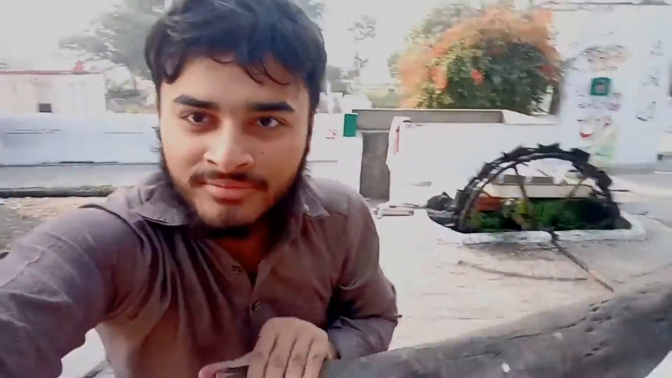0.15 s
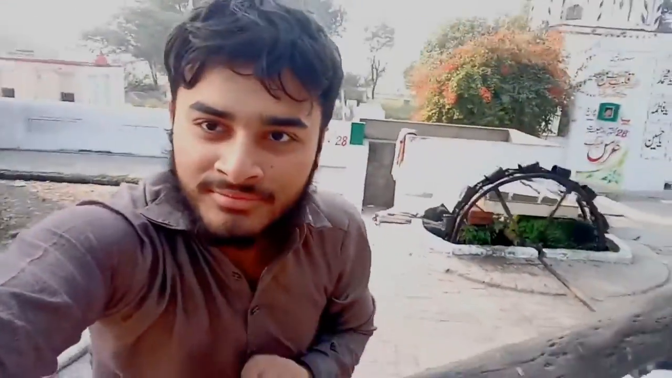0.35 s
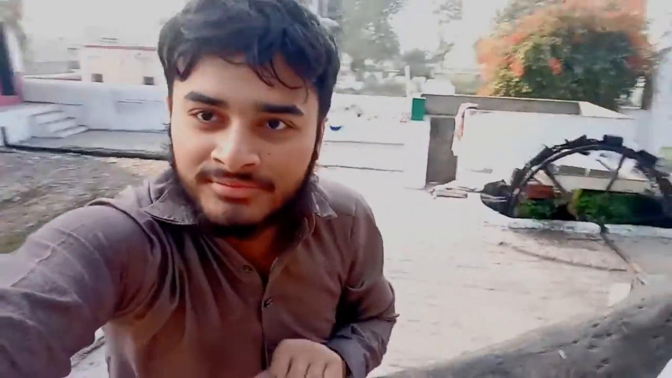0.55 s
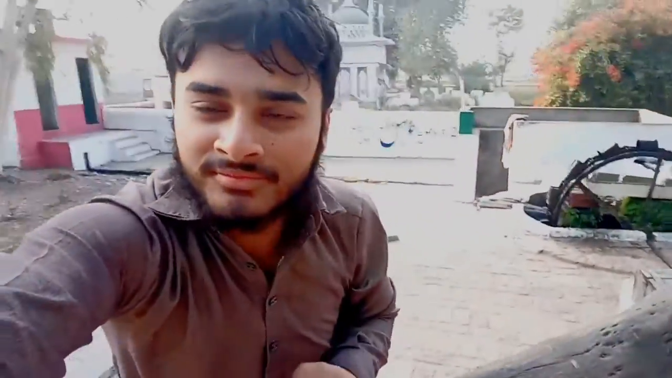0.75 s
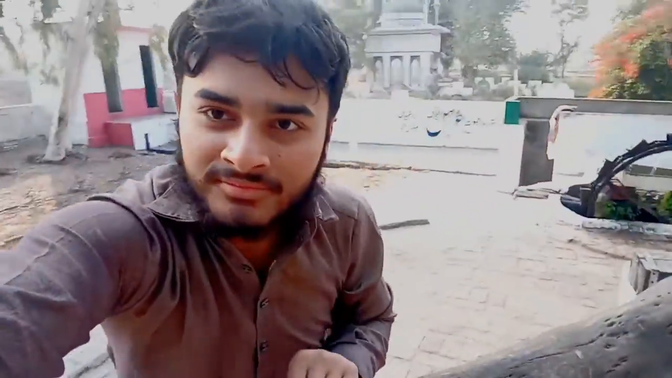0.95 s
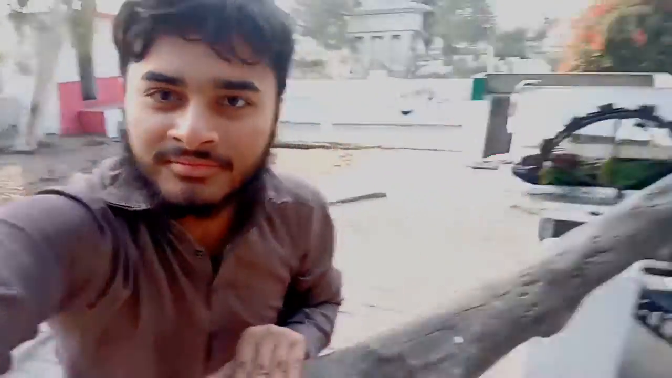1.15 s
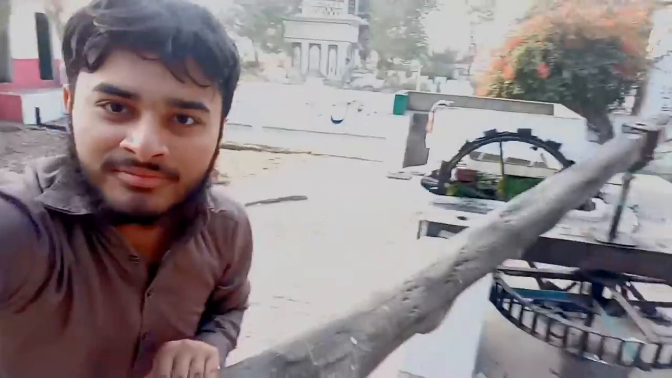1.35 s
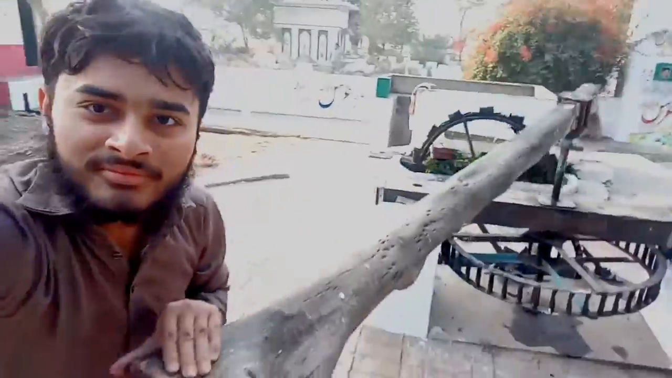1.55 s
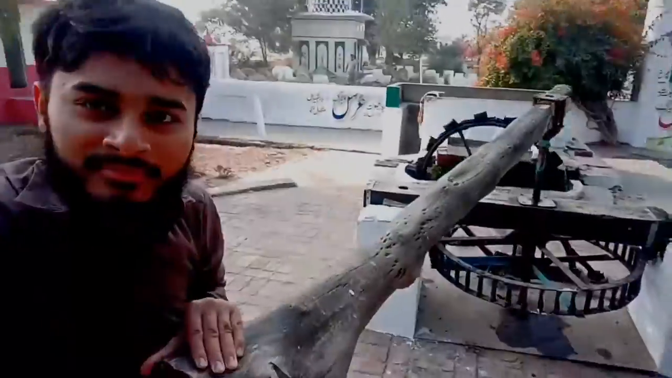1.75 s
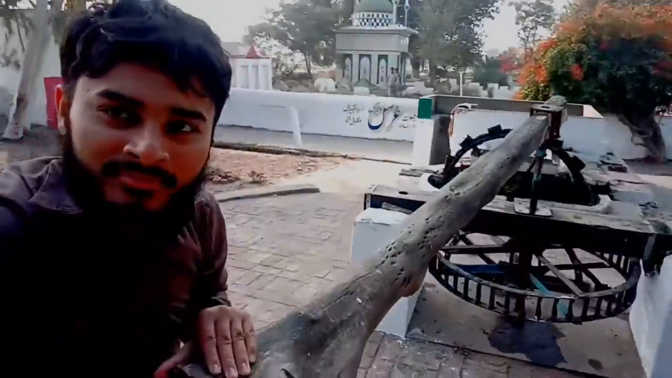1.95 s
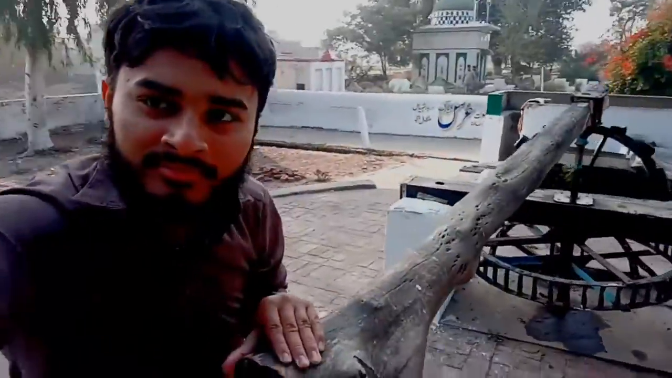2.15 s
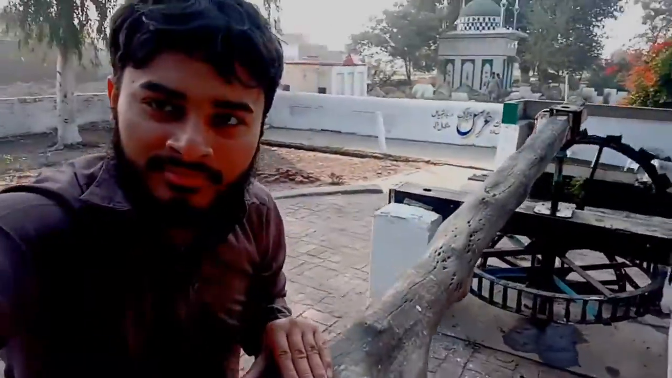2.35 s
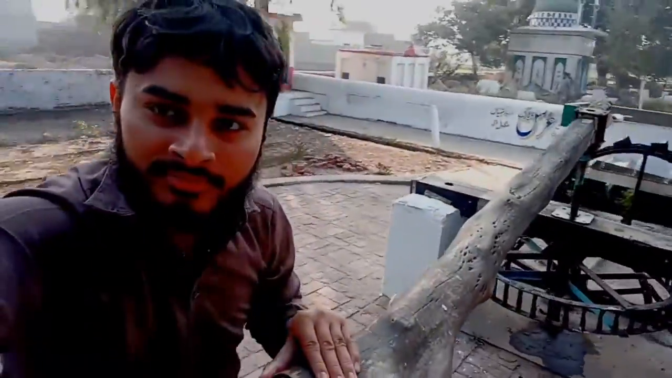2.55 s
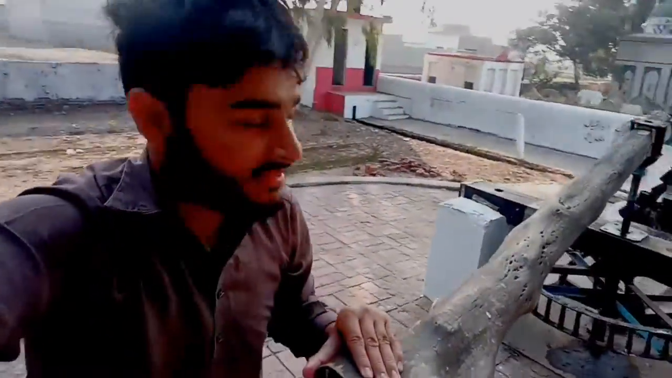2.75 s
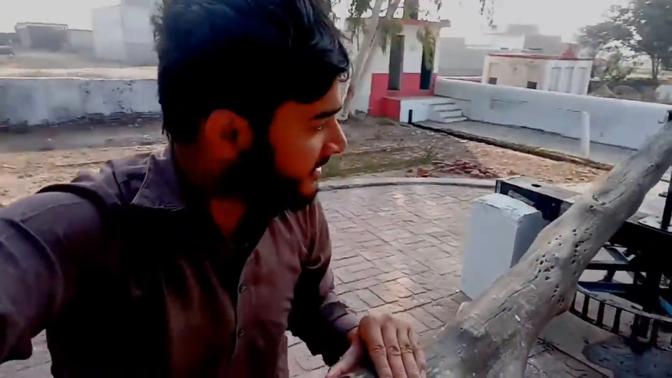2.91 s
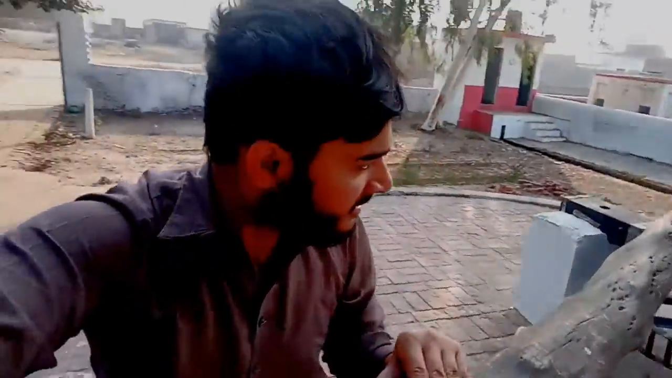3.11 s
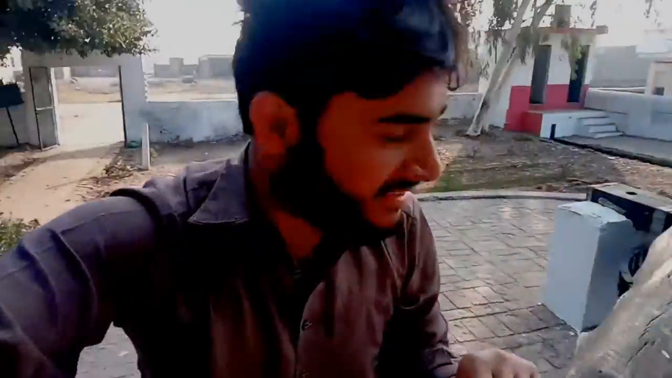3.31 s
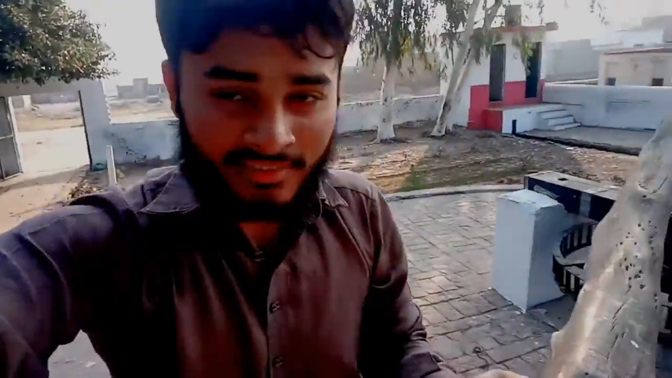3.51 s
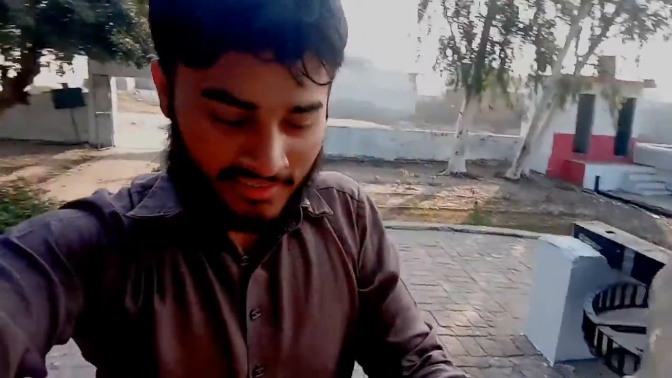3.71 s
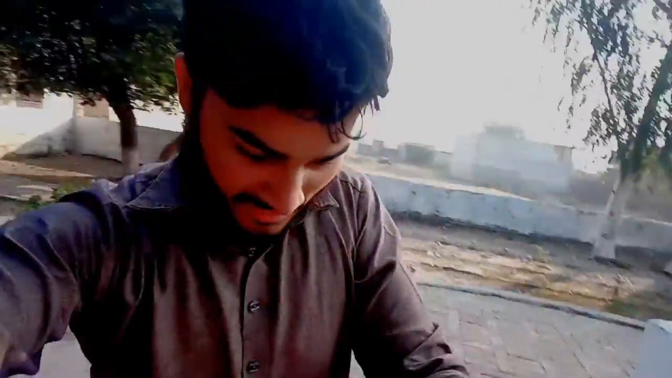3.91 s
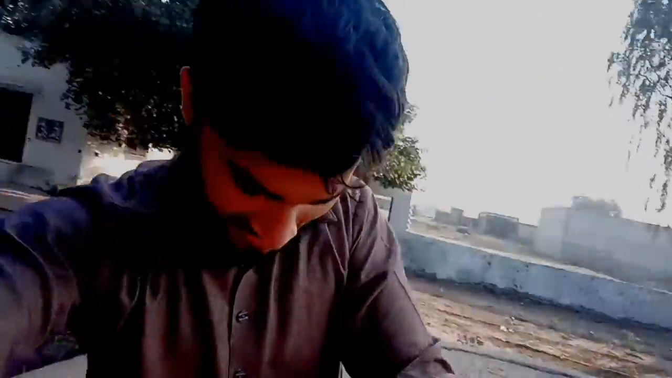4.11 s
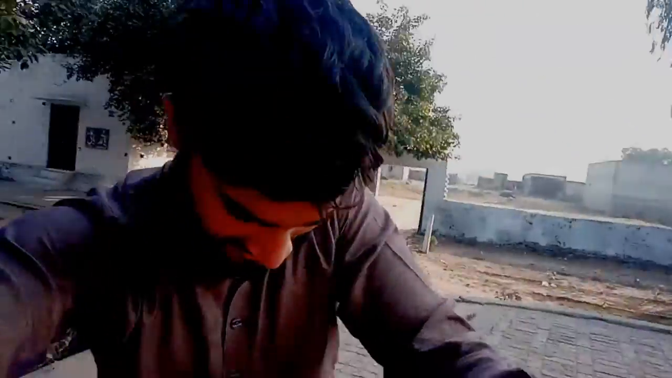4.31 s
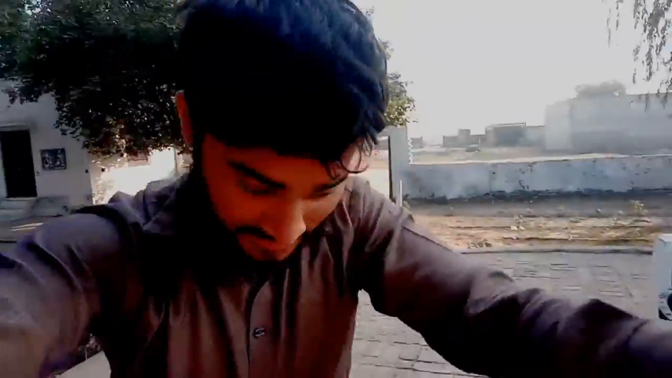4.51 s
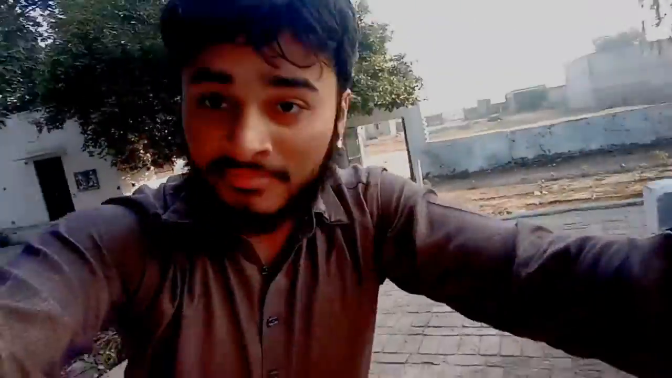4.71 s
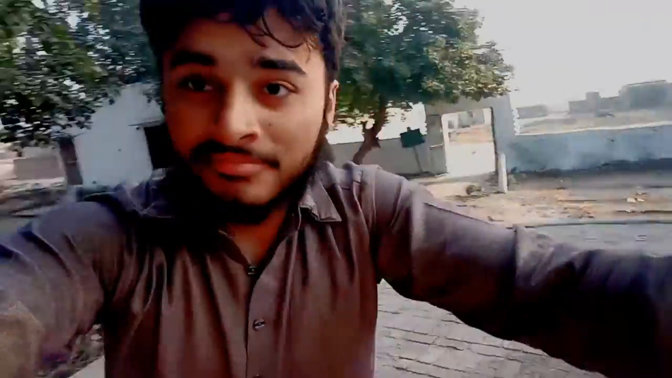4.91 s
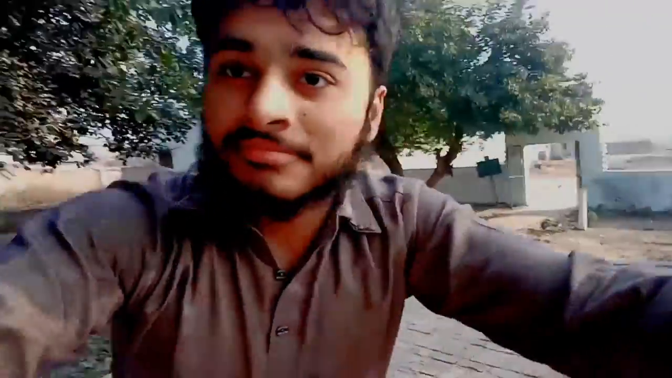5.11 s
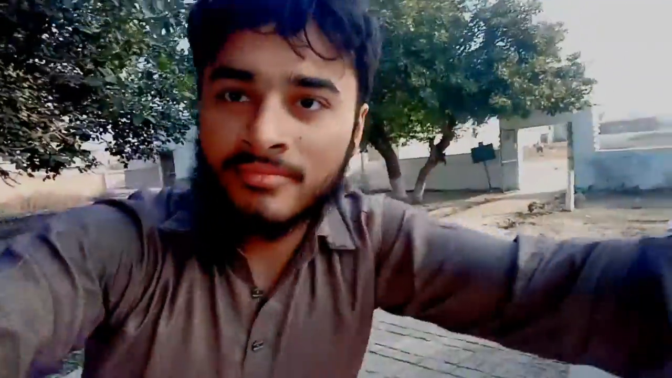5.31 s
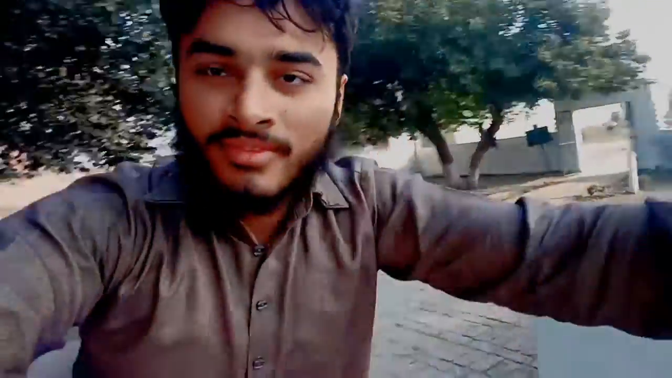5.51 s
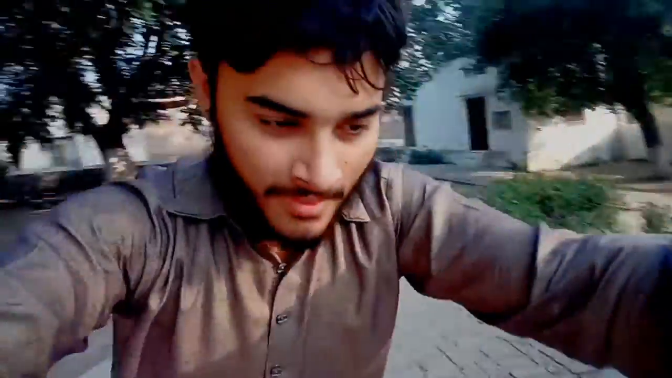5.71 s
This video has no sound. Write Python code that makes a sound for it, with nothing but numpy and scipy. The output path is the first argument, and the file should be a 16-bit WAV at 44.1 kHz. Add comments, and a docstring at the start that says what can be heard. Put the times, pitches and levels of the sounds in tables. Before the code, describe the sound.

A hand-turned well wheel ratchets unevenly: hard metallic clacks in little clusters, ringing briefly and damped as the pawl lands. Early hollow knocks and faint creaks give way to steady bright clatter, a sharp double tick midway, duller clacks later, then strong knocking hits near the end. Grinding gears continue throughout; the outdoor echo is slight, and low air stirs at the nearby phone microphone.

```python
"""Uneven steel clacks with short ringing tails, over a grinding scrape and rumble, knocks, ticks and low puffs of air.
A hand-turned well wheel in an open yard: a steel pawl is dragged up each ratchet tooth, drops and bounces.
Every contact is a noise burst plus damped modes of the iron wheel and of the pawl, which landing damps.
Gears are patchy noise, knocks are damped sines and band noise, air is low noise, the yard a decaying noise echo."""
import sys
import numpy as np
from scipy import signal
from scipy.fft import rfft, irfft, next_fast_len
from scipy.io import wavfile
from scipy.ndimage import uniform_filter1d, minimum_filter1d, map_coordinates

SR = 44100
rng = np.random.default_rng(int(sys.argv[2]) if len(sys.argv) > 2 else 0)


def to_wav(s):
    """Save 16-bit WAV."""
    ch = np.atleast_2d(s).T  # columns
    pcm = np.round(np.clip(ch, -1, 1) * 32767)  # PCM
    wavfile.write(sys.argv[1], SR, pcm.astype(np.int16))


N = 258426

# pawl contacts: (time [s], clack level [dB], boost under 2 kHz [dB], ring level [dB],
# place struck along the pawl [0-1], hardness [dB per octave], jingle level [dB], free flight [s])
CONTACTS = [(0.156, -30, -9.0, -23.5, 0.08, -12, -56, 0.029),
            (0.181, -26, 10.5, -15.9, 0.58, -1.9, -40.5, 0.064),
            (0.231, -25, 3.5, -24, 0.55, 7, -50.2, 0.016), (0.402, -20.5, 4, -15.5, 0.1, 5, -39.5, 0.021),
            (0.447, -18.5, -1.5, -26, 0.5, -3, -52, 0.072), (0.595, -17.5, 4.5, -20, 0.69, -5, -54, 0.025),
            (0.619, -11, -5, -20.5, 0.44, 4, -35.5, 0.045), (0.66, -14.5, -0.5, -22.4, 0.72, 1, -55, 0.039),
            (0.843, -8, -11.5, -6, 0.99, -4.5, -34, 0.028),
            (0.898, -19.5, -8.5, -17.5, 0.08, 3, -53.5, 0.0094),
            (1.088, -9.5, -7, -9, 0.14, 8, -34.5, 0.051), (1.14, -16, -4, -16, 0.89, -9.5, -54, 0.03),
            (1.323, -13, -1, -5.5, 0.15, -1.5, -32.5, 0.076),
            (1.357, -19, -8, -10, 0.27, -4.5, -45.5, 0.057),
            (1.394, -14.5, -4, -11.5, 0.95, -9, -47, 0.031), (1.559, -11, -5.5, -3.5, 0.13, -1.8, -35, 0.1),
            (1.595, -21, 1, -6.6, 0.63, -3, -47, 0.015), (1.615, -22, -5, -16.5, 0.2, -3, -63, 0.029),
            (1.642, -30, 10.5, -30, 0.21, -5, -61.5, 0.075),
            (1.797, -11.2, -7.5, -9.5, 0.18, 1.5, -32.5, 0.0065),
            (1.813, -22, 5.5, -18.1, 0.94, 3, -54, 0.014), (1.859, -22, 4, -15, 0.88, 2.5, -57, 0.012),
            (2.01, -8.5, -8.5, -13, 0.37, -13, -36.5, 0.0047), (2.039, -10, -3, -11, 0.46, 1.5, -38, 0.07),
            (2.089, -17, -7, -18, 0.71, -4.5, -54.5, 0.013), (2.273, -8.5, -6, -9, 0.1, 7, -30.5, 0.033),
            (2.306, -16.5, 0.5, -11, 0.6, 1, -45.5, 0.019), (2.325, -19, 0.5, -13, 0.43, -2, -53.5, 0.026),
            (2.505, -12, -5, -11, 0.46, -6.5, -37.5, 0.02), (2.525, -28, -3, -14, 0.39, -5.9, -48.5, 0.016),
            (2.57, -14, -7.0, -9, 0.4, 0, -42.5, 0.013), (2.759, -8.5, -14.5, -16.5, 0.66, 0.1, -31, 0.033),
            (2.783, -20.2, -10, -19.5, 0.58, -5, -48.5, 0.032),
            (2.831, -25.5, -12, -16, 0.35, -3, -58, 0.0027),
            (3.069, -12.5, -3.5, -15, 0.03, 2.1, -26.5, 0.026),
            (3.101, -25.5, 1, -16, 0.08, -8, -52, 0.0063), (3.142, -22.5, 2, -21.3, 0.08, -4, -63, 0.013),
            (3.353, -10.5, -3, -11.5, 0.26, -1, -40, 0.035),
            (3.415, -21.2, 5.5, -17, 0.04, 7, -49.5, 0.023),
            (3.594, -10.5, -10.5, -11.5, 0.62, 6, -33, 0.11),
            (3.634, -18.5, -0.5, -20.5, 0.47, 8, -42, 0.03),
            (3.829, -16.5, 1.5, -11, 0.42, -8.5, -45.5, 0.027),
            (3.846, -23, 10.5, -14.5, 0.71, -3.9, -42, 0.022),
            (3.883, -18.5, 3.5, -19.5, 0.46, -1.5, -55.5, 0.025),
            (4.078, -18.2, 6.5, -10, 0.28, -8, -42, 0.032), (4.098, -23, 7.5, -12, 0.3, -2, -51, 0.013),
            (4.135, -20.5, 2.5, -23.5, 0.72, 3, -56.2, 0.045),
            (4.307, -15, -9, -18, 0.48, -1.5, -50, 0.049),
            (4.355, -24.2, -10, -22.5, 0.43, 8.1, -56.2, 0.0053),
            (4.535, -16.5, -0.5, -23, 0.16, 6, -35.5, 0.043), (4.572, -26, 7, -21, 0.4, 5, -60, 0.0082),
            (4.732, -19, -4, -15.5, 1, -5.5, -45, 0.045), (4.789, -19.5, -7.5, -33, 0.16, 5, -64, 0.062),
            (4.916, -16, 1, -12, 0.48, 9, -47.2, 0.046), (5.088, -12, -18.5, -15.5, 0.34, 2, -42, 0.03),
            (5.117, -21, 3, -20.5, 0.93, 3, -60, 0.017), (5.133, -23, 0, -21, 0.76, -4, -59, 0.064),
            (5.251, -12.5, -0.5, -11, 0.72, 8, -57, 0.029), (5.337, -30.5, 13.5, -22, 0.0, -7, -67, 0.015),
            (5.378, -24, -3.5, -38, 0.44, -5, -66, 0.059), (5.421, -11.5, -3, -13.8, 0.36, 2, -35.5, 0.011),
            (5.57, -9.5, -1.5, -8, 0.05, 2, -40, 0.026), (5.61, -23, 6.5, -18, 0.83, 1, -61, 0.021),
            (5.721, -9, -4, -10, 0.08, 4, -45, 0.023), (5.766, -19.5, -3, -19.2, 0.44, 1.5, -64, 0.03)]


def amp(db):
    """Gain of a level in dB."""
    return 10 ** (np.asarray(db) / 20)


def unit(x):
    """Scaled to rms 1."""
    return x / np.sqrt(np.mean(x ** 2) + 1e-20)


def along(points, hz):
    """Interpolates (frequency [Hz], value) points on a log frequency axis."""
    point_hz, value = np.transpose(points)
    return np.interp(np.log(hz + 1), np.log(point_hz + 1), value)


def wobble(knots_per_s):
    """A smooth random curve as long as the scene."""
    knots = rng.standard_normal(int(N * knots_per_s / SR) + 4)
    return map_coordinates(knots, [np.arange(N) * knots_per_s / SR])


def filtered(x, response):
    """x times a zero-phase response of frequency."""
    m = next_fast_len(len(x) + 2048)
    hz = np.fft.rfftfreq(m, 1 / SR)
    return irfft(rfft(x, m) * response(hz), m)[:len(x)]


def noise(spectrum, size=N):
    """Coloured noise of rms 1."""
    white = rng.standard_normal(size)
    return unit(filtered(white, lambda hz: amp(along(spectrum, hz))))


def around(hz, width_hz, size):
    """Noise of rms 1 in a band about hz."""
    band = [(hz / (1 + 8 * width_hz / hz), -120), (hz - width_hz / 2, -6), (hz, 0),
            (hz + width_hz, -10), (hz + 12 * width_hz, -120)]
    return noise(band, size=size)


def patchy(x, depth_db):
    """x at rms 1 with random swells, each a few hundred Hz wide and about a tenth of a second long."""
    z = signal.stft(x, nperseg=512)[2]
    field = uniform_filter1d(rng.standard_normal(z.shape), size=5, axis=0)
    field = uniform_filter1d(field, size=14, axis=1)
    swelling = signal.istft(z * amp(depth_db * unit(field)), nperseg=512)[1]
    return unit(swelling[:len(x)])


def onset(t, rise_s):
    """Exponential rise from 0 towards 1."""
    return 1 - np.exp(-t / rise_s)


def add(out, s, x):
    """Mixes x into out from time s."""
    part = out[round(s * SR):][:len(x)]
    part += x[:len(part)]


def ringing(modes, t, scatter_db, flicker_db, detune=0):
    """Damped sines of random strength, phase and detuning, each dipping on its own, 70 knots a second."""
    hz, db, t60_s = np.transpose(modes)[:, :, None]
    strength, shift = rng.standard_normal(hz.shape), rng.standard_normal(hz.shape)
    phase_turns = rng.random(hz.shape)
    knots = rng.standard_normal((len(hz), 25))
    waver = np.array([np.interp(t * 70, np.arange(25), row) for row in knots])
    level = amp(db + scatter_db * strength - flicker_db * np.abs(waver) - 60 * t / t60_s)
    sines = np.sin(2 * np.pi * (hz * (1 + detune * shift) * t + phase_turns))
    return np.sum(level * sines, axis=0)


def pawl():
    """The place struck sets each bending mode, hardness tilts them; landing and the next contact damp them."""
    # bending modes: (frequency [Hz], relative level at an antinode [dB], t60 [s],
    # half-waves along the struck length, shift [half-waves])
    bending_modes = [(2065, -13, 0.48, 1.82, 0.87), (3669, 0, .57, 2.108, .32),
                     (5335, -16, 0.84, 2.74, 0.42), (5783, -19, 0.52, 2.795, 0.67),
                     (6752, -27, 0.58, 3.93, -0.023)]
    # shortest waves: (frequency [Hz], relative level [dB], t60 [s])
    jingle_modes = [(13226, 0, .14), (8301, -11, .2), (12115, -10, .18), (14174, -8, .14), (8834, -14, .16),
                    (9814, -15, .16), (7924, -18, .12), (10406, -17, .14), (11230, -19, .12),
                    (6330, -12, .1)]
    # hiss of a steel contact: (frequency [Hz], relative density [dB per Hz])
    splash_spectrum = [(6000, -120), (7500, -12.5), (10500, -17.5), (13300, 11), (15500, -16)]
    node_db = -27  # what is left of a mode struck on its node
    pivot_hz = 3672  # hardness tilts the ring about this frequency
    out, t = np.zeros(N), np.arange(SR // 3) / SR
    next_s = [row[0] for row in CONTACTS[1:]] + [N / SR]
    hz, mode_db, t60_s, waves, shift = np.transpose(bending_modes)
    for (s, _, _, ring_db, place, hard_db, jingle_db, flight_s), cut_s in zip(CONTACTS, next_s):
        landed_s = np.maximum(t - flight_s, 0)
        rattle_db = 3 + 7 * np.clip(landed_s / 0.0091, 0, 1)  # resting on a tooth, it rattles

        shape_db = 10 * np.log10(np.cos(np.pi * (waves * place + shift)) ** 2 + amp(node_db) ** 2)
        tilt_db = hard_db * np.log2(hz / pivot_hz)
        struck = np.transpose([hz, ring_db + mode_db + shape_db + tilt_db, t60_s])
        bending = ringing(struck, t, scatter_db=0, flicker_db=rattle_db)
        damped = amp(-12.5) + amp(-60 * landed_s / 0.083)
        stopped = amp(-19) + amp(-60 * np.maximum(t - (cut_s - s), 0) / 0.0071)

        jingle = ringing(jingle_modes, t, scatter_db=4.0, flicker_db=rattle_db + 3, detune=.0006)
        splash = amp(jingle_db - 3.5 - 60 * t / 0.052) * noise(splash_spectrum, size=len(t))
        # landing does not damp the shortest waves, it only makes them flicker more
        ring = bending * damped * stopped + amp(jingle_db) * jingle + splash
        fade_out = np.clip((t[-1] - t) / .05, 0, 1)
        add(out, s, ring * onset(t, 0.00089) * fade_out)
    return out


def wheel():
    """Each contact is a lumpy noise burst that rings the iron wheel, its modes slightly shifted each time."""
    # short modes: (frequency [Hz], relative level [dB], t60 [s])
    wheel_modes = [(2415, -4, .1), (2670, -4, .16), (2892, -2, .2), (3463, -5, .12), (1330, -14, .06),
                   (1500, -14, .06), (1690, -12, .06), (1900, -8, .06), (3060, -8, .06), (3260, -6, .06),
                   (3990, -10, .05), (4620, -16, .05)]
    # clack: (frequency [Hz], relative density [dB per Hz])
    clack_spectrum = [(100, -120), (200, -18.5), (990, -13), (2380, 0.5), (3610, 0), (4330, -9),
                      (5900, -22), (7350, -36.5), (10500, -53.5), (13400, -46.5), (14600, -48.5),
                      (15600, -61.5)]
    out, t = np.zeros(N), np.arange(SR // 6) / SR
    for s, clack_db, low_db, *_ in CONTACTS:
        curve = map_coordinates(rng.standard_normal(200), [t * 450])  # 450 knots a second
        lumps = unit(amp(2.12 * curve))
        fading = amp(-4.5 - 60 * t / 0.0047) + amp(-3.5 - 60 * t / 0.072) + amp(-8.5 - 60 * t / 0.2)
        burst = noise(clack_spectrum, size=len(t)) * lumps * fading
        ring = amp(-2.5) * ringing(wheel_modes, t, scatter_db=4.5, flicker_db=7.5, detune=0.0041)
        blow = (burst + ring) * onset(t, 0.00086)
        boosted = filtered(blow, lambda hz: amp(low_db / (1 + (hz / 2100) ** 8)))
        add(out, s, amp(clack_db) * boosted)
    return out


def knocks():
    """Knocks, soft to loud, some on pawl contacts: one mode, dying sooner the higher it is, in a puff of noise."""
    # (time [s], level [dB], pitch [Hz])
    knock_list = [(0.53, -27.5, 404), (0.608, -14.5, 448.6), (0.645, -17.5, 434.5), (3.264, -31.5, 604),
                  (3.355, -20, 1067), (3.596, -25.5, 851), (3.635, -21.5, 1170), (3.834, -21, 1128),
                  (4.311, -23, 1160), (4.536, -25, 1164), (4.569, -23, 1144), (4.735, -20, 1182),
                  (4.924, -29.5, 605), (4.945, -23, 715), (4.965, -25, 520), (5.088, -25, 900),
                  (5.289, -29, 484), (5.572, -9.5, 1934), (5.722, -18, 2000), (5.73, -33, 474)]
    out, t = np.zeros(N), np.arange(SR // 3) / SR
    for s, db, hz in knock_list:
        t60_s = 110 / (hz + 300)
        body = np.sin(2 * np.pi * hz * t) * amp(-60 * t / t60_s)
        puff = 0.42 * around(hz, 0.91 * hz, size=len(t)) * amp(-60 * t / 0.14)
        add(out, s, amp(db) * (body + puff) * onset(t, 0.001))
    return out


def thuds():
    """Lower, duller blows with no clear pitch: decaying band noise."""
    # (time [s], level [dB])
    thud_list = [(0.606, -42), (4.445, -33), (4.57, -28.5)]
    out, t = np.zeros(N), np.arange(SR // 3) / SR
    for s, db in thud_list:
        add(out, s, amp(db - 60 * t / 0.16) * around(352, 170, size=len(t)) * onset(t, 0.0065))
    return out


def ticks():
    """Dry ticks, one of them double: very short bursts of wide-band noise."""
    # (time [s], level [dB])
    tick_list = [(0.765, -24), (2.681, -7.5), (2.684, -7), (3.258, -18), (3.902, -12)]
    out, t = np.zeros(N), np.arange(SR // 3) / SR
    for s, db in tick_list:
        add(out, s, amp(db - 60 * t / 0.0084) * around(2000, 2430, size=len(t)) * onset(t, 0.0011))
    return out


def creaks():
    """Creaks and groans of the beam: band noise that swells, wavers and dies."""
    # (time [s], length [s], level [dB], pitch [Hz], width [Hz])
    creak_list = [(.53, 0.21, -35, 425, 200), (0.581, 0.12, -34.5, 790, 504), (3.91, .12, -33.5, 1820, 330),
                  (5.43, 0.098, -40, 182, 29.6)]
    out, t = np.zeros(N), np.arange(SR // 3) / SR
    for s, length_s, db, hz, width_hz in creak_list:
        arch = np.sin(np.pi * np.minimum(t / length_s, 1))
        swell = np.sqrt(np.clip(arch, 0, 1))
        waver = amp(db + 2.5 * wobble(60)[:len(t)])
        add(out, s, waver * swell * around(hz, width_hz, size=len(t)))
    return out


def gears():
    """The pawl scrapes up the teeth while the axle rumbles: two patchy noises with wavering levels."""
    # (time [s], scrape level [dB], rumble level [dB])
    grind_levels = [(0.0, -33.5, -49), (0.45, -38.5, -46.5), (0.6, -35, -36.5), (0.82, -33.5, -49),
                    (1.43, -40.5, -52.5), (2.58, -39, -52), (2.68, -37, -46), (3.15, -37, -58),
                    (3.26, -35, -46), (3.59, -40, -51), (3.97, -33, -53), (4.42, -39, -51),
                    (5.04, -34.5, -45.5), (5.22, -32.5, -45), (5.63, -35, -41), (5.86, -31, -39)]
    # both: (frequency [Hz], relative density [dB per Hz])
    scrape_spectrum, rumble_spectrum = [(530, -15), (900, -10), (1060, -7.5), (1570, -2), (1750, -3),
                                        (3460, 3), (5430, -20), (8750, -51), (13800, -39), (15500, -62)], [(100, -54), (200, -6.5), (420, -1.5), (700, -4.5),
                                                        (1100, -10.5), (2000, -54.5)]
    grit_db, surge_db = 1.2, 1.2  # fast and slow wavering of the scrape
    s, scrape_db, rumble_db = np.transpose(grind_levels)
    t = np.arange(N) / SR
    waver = amp(grit_db * wobble(150) + surge_db * wobble(30))
    gritty = unit(waver * patchy(noise(scrape_spectrum), depth_db=2.9))
    scrape = amp(np.interp(t, s, scrape_db)) * gritty
    rumble_level = amp(np.interp(t, s, rumble_db) + 2.4 * wobble(22))
    return scrape + rumble_level * patchy(noise(rumble_spectrum), depth_db=3)


def air():
    """Walking stirs lumpy low wind at the microphone port, with a few stronger puffs."""
    # (frequency [Hz], relative density [dB per Hz])
    air_spectrum = [(20, -39.5), (45, -15), (85, 2.5), (180, -0.5), (260, -31), (500, -120)]
    # (time [s], level [dB])
    breeze_levels = [(0, -53), (.54, -59), (.63, -39), (.74, -56), (1.3, -55), (2.2, -58), (2.65, -54),
                     (3.2, -60.5), (4.4, -52.5), (5.1, -52), (5.3, -41), (5.45, -48.5), (5.7, -43),
                     (5.86, -47)]
    # (start [s], level at the crest [dB], length [s])
    puff_list = [(3.809, -43.5, 0.043), (5.542, -30, 0.017), (5.647, -28.5, 0.046), (5.835, -29, 0.021)]
    s, air_db = np.transpose(breeze_levels)
    lumpy = unit(amp(5.2 * wobble(12)) * noise(air_spectrum))
    out = amp(np.interp(np.arange(N) / SR, s, air_db)) * lumpy
    for start_s, db, length_s in puff_list:
        size = round(length_s * SR)
        add(out, start_s, amp(db) * np.hanning(size) * noise(air_spectrum, size=size))
    return out


def yard(x):
    """Low walls answer: a noise tail in which each frequency dies at its own speed."""
    # (frequency [Hz], t60 [s])
    yard_decay = [(300, 0.5), (2000, 0.16), (6000, 0.065), (14000, 0.31)]
    hz, t, z = signal.stft(rng.standard_normal(SR // 2), SR, nperseg=256)
    t60_s = along(yard_decay, hz)[:, None]
    tail = signal.istft(z * amp(-60 * t / t60_s), SR, nperseg=256)[1]
    delayed = np.pad(x, (600, 0))  # samples
    return signal.fftconvolve(delayed, tail / np.linalg.norm(tail))[:N]


def scene():
    """Ratchet, knocks and creaks with their echo, then gears and air."""
    machine = pawl() + wheel() + knocks() + thuds() + ticks() + creaks()
    return (machine + amp(-16.0) * yard(machine) + gears() + air())[None]


def record(dry):
    """The phone limits the tallest peaks, loses the deepest bass and keeps nothing above its band limit."""
    ceiling, top_hz, window = .93, 15600, 129  # full scale = 1, Hz, samples
    needed = np.minimum(1, ceiling / (np.abs(dry[0]) + 1e-9))
    gain = uniform_filter1d(minimum_filter1d(needed, size=window), size=window)

    def response(hz):
        low_cut = 1 / (1 + (28 / (hz + 1)) ** 2)
        high_cut = 1 / (1 + (hz / 14700) ** 16)
        return (hz < top_hz) * low_cut * high_cut

    return filtered(dry[0] * gain, response)[None]


dry = scene()
out = record(dry)
to_wav(out)
```